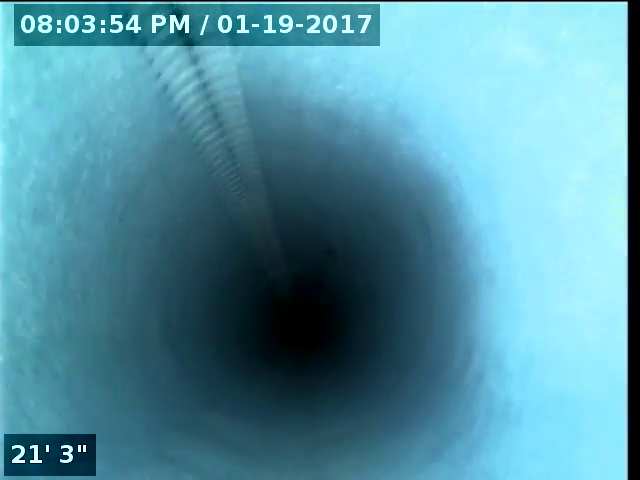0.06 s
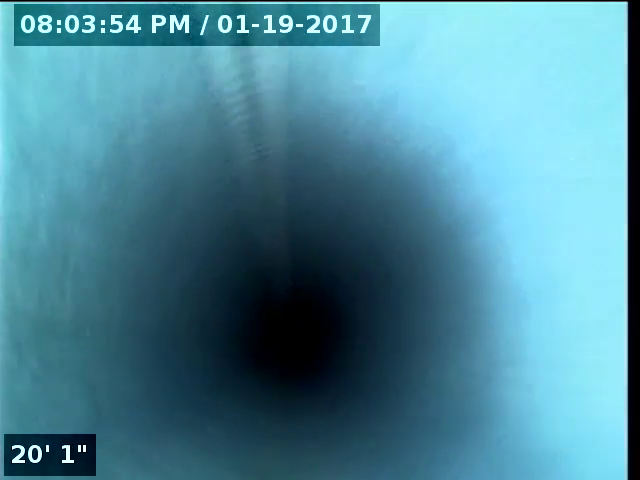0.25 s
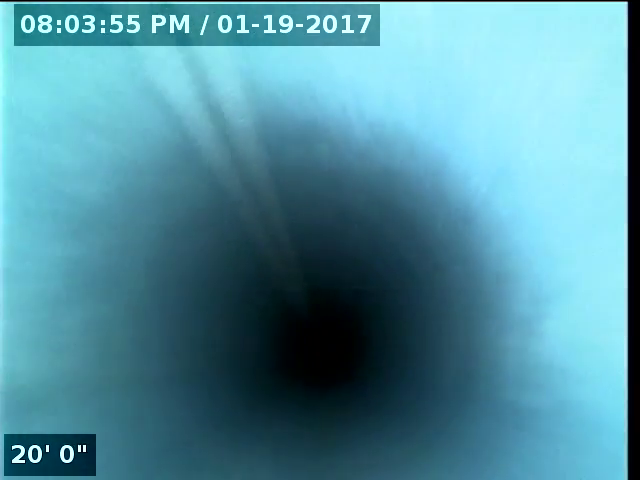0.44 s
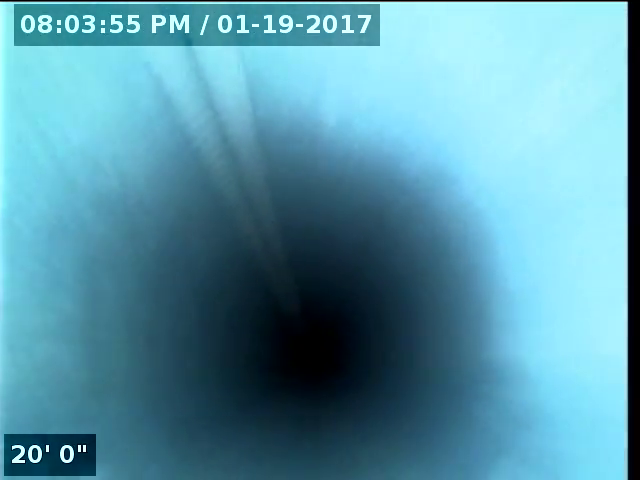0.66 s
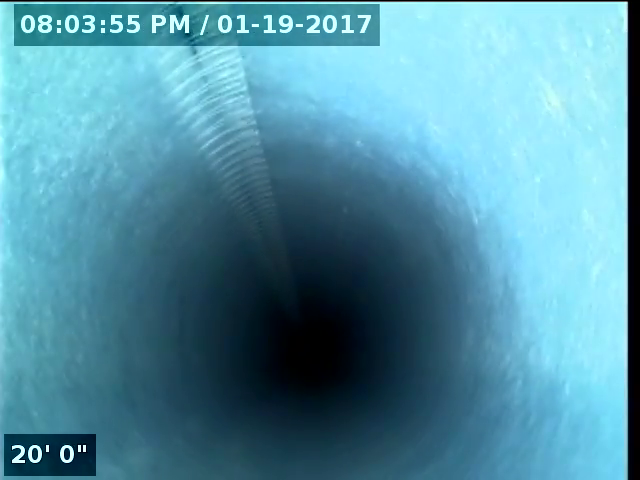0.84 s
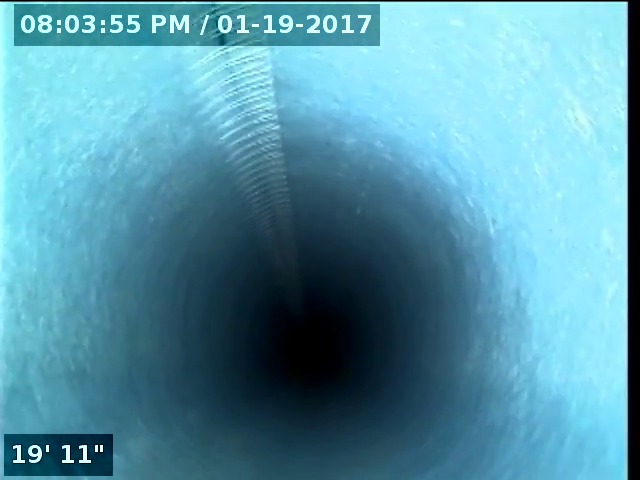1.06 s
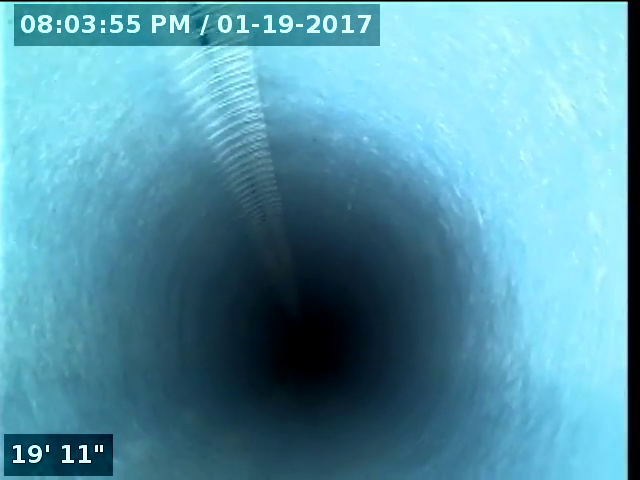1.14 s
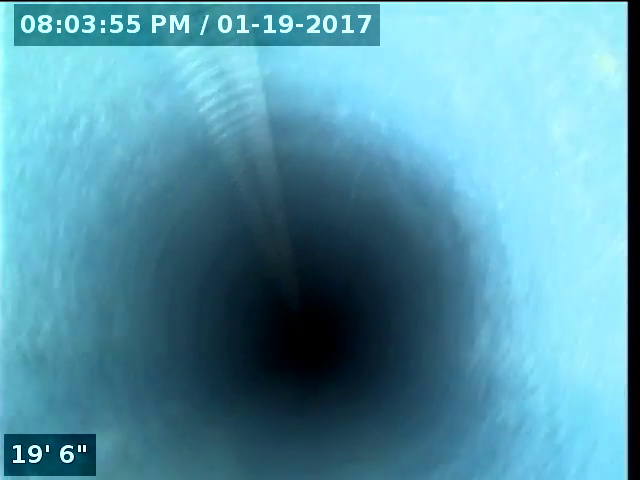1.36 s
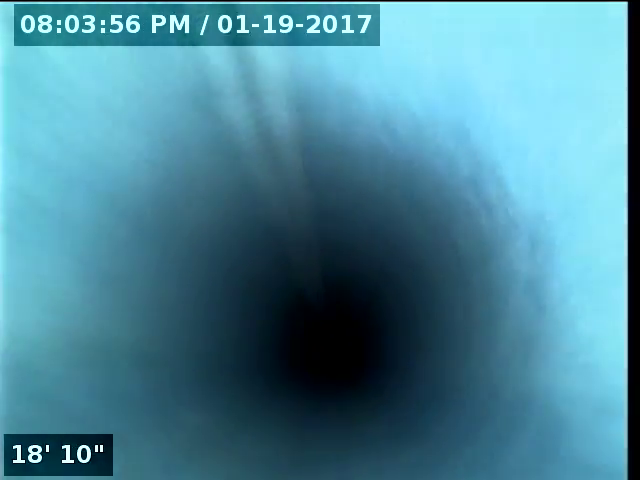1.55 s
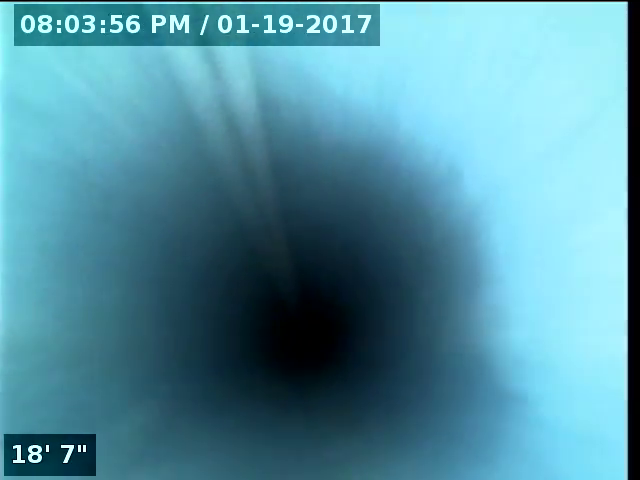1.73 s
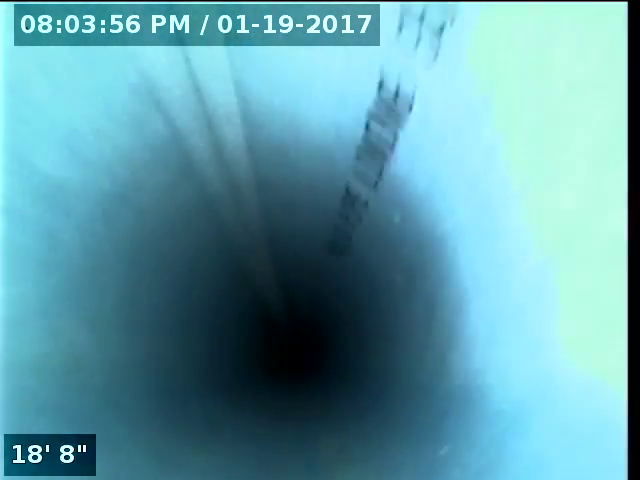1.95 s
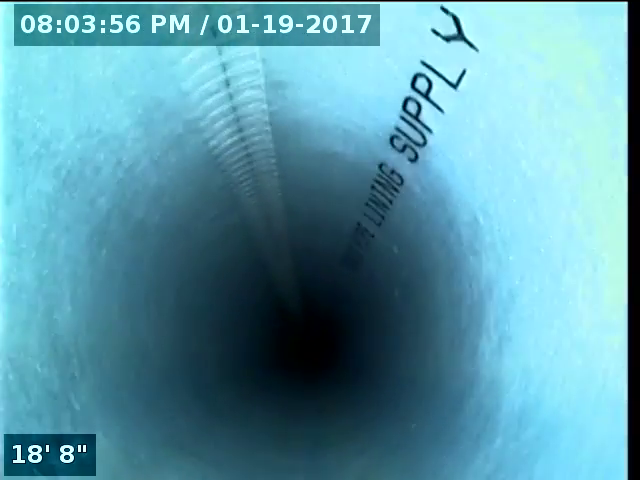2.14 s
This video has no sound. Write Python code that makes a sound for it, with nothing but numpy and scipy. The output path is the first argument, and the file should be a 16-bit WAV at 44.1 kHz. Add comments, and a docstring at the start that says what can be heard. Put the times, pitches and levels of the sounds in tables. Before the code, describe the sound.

A cable rubs through a plastic drain pipe from the start. At about 0.2 seconds one hard, close knock rings the monitor's housing with a hollow boom, overloading the microphone. The rubbing drops low by 0.4 seconds, with scattered light taps, then swells again from 1.1 to 1.6. Soft hollow bumps come around 1 second and 2.1 seconds. A faint steady hiss lies underneath.

```python
"""Camera in a drain pipe

A stiff cable pulls an inspection camera back through a plastic drain pipe, rubbing in uneven pulls.
It taps and bumps along the way, and the bumps set off a low, hollow boom.
One hard knock rings the monitor unit's housing and overloads its small microphone.
The recorder adds a steady hiss and cuts a narrow notch out of the treble."""
import sys
import numpy as np
from scipy import signal
from scipy.fft import rfft, irfft, next_fast_len
from scipy.io import wavfile

SR = 44100
rng = np.random.default_rng(int(sys.argv[2]) if len(sys.argv) > 2 else 0)


def to_wav(s):
    """Save 16-bit WAV."""
    ch = np.atleast_2d(s).T  # columns
    pcm = np.round(np.clip(ch, -1, 1) * 32767)  # PCM
    wavfile.write(sys.argv[1], SR, pcm.astype(np.int16))


N = 97020
TIME = np.arange(N) / SR

# The tone of the recorder's hiss. Each row: frequency in Hz, relative level in dB.
HISS_TONE = [(25, 4), (100, 2.5), (500, -1.5), (2000, 9), (3300, -19.5), (4500, -12), (5500, -5),
             (6200, -1), (7000, -6), (7700, -10), (8200, -31)]
# How strongly the cable rubs as it is pulled. Each row: time in seconds, level in dB.
PULL_LEVELS = [(0, -30), (.12, -28), (.21, -28.5), (.3, -33), (.4, -48), (.52, -51.5), (.62, -50),
               (.68, -47.5), (.83, -49), (.89, -41), (.98, -43), (1.09, -43), (1.16, -33.5), (1.29, -29.5),
               (1.45, -32.5), (1.55, -37.5), (1.64, -48), (1.77, -47), (1.84, -43), (1.98, -48.5),
               (2.06, -42), (2.13, -41), (2.2, -39.5)]
# The tone of the rubbing. Each row: frequency in Hz, relative level in dB.
RUB_TONE = [(30, -55), (120, -8), (190, -8.5), (250, 5), (320, -3), (520, 2.5), (950, -6), (1400, -5.5),
            (2000, -11), (2400, -9), (3100, -17), (3700, -37.5), (6000, -33), (8000, -49)]
# The thin, high swish on top of the rubbing. Each row: time in seconds, level in dB.
SWISH_LEVELS = [(0, -40.5), (.2, -56), (.38, -62), (.49, -53.5), (.6, -64.5), (.72, -54.5), (.9, -65),
                (1.05, -59.5), (1.3, -56), (1.62, -52.5), (1.75, -64), (1.85, -51), (2.05, -60.5),
                (2.2, -52)]
# Light taps of the cable, plus one slow, dull drag of it (the row at 0.875 s). Each row: start in seconds,
# level in dB, centre in Hz, width in Hz, rise time in seconds, fade time in seconds. A fade time (t60) is how
# long a sound takes to drop 60 dB.
CABLE_TAPS = [(0.051, -44, 435, 500, 0.011, 0.061), (0.08, -30, 2140, 2980, 0.0018, 0.06),
              (0.11, -24, 478, 170, 0.0056, 0.13), (.42, -42.5, 584, 587, 0.026, 0.078),
              (.648, -41.5, 435, 550, .012, 0.1), (.67, -48, 2080, 1400, 0.0098, 0.19),
              (0.844, -40, 860, 1220, 0.0066, 0.19), (.875, -40, 740, 1050, 0.065, 0.56),
              (0.976, -33.5, 546, 220, 0.0039, 0.34), (.979, -33.5, 1240, 1240, 0.0044, 0.081),
              (1.13, -42, 1300, 1900, .005, .12), (1.156, -42, 2640, 3200, 0.003, 0.085),
              (1.255, -47.5, 2960, 2200, .006, 0.16), (1.424, -45, 3180, 2200, 0.0062, 0.085),
              (1.463, -28, 1420, 650, 0.0062, 0.054), (1.558, -36.5, 2840, 450, 0.0075, 0.14),
              (1.671, -46.5, 3150, 503, 0.013, 0.083), (1.917, -40, 1610, 810, 0.0066, 0.24),
              (2.0705, -30.5, 680, 590, 0.0017, 0.15), (2.074, -38.5, 1470, 700, 0.0033, 0.14),
              (2.119, -38, 1130, 1100, 0.01, 0.1)]
# Soft bumps that set off the boom. Each row: start in seconds, level in dB.
SOFT_BUMPS = [(0.042, -28), (0.245, -13.5), (.645, -47), (0.757, -49), (0.986, -33.5), (1.04, -44),
              (1.165, -33), (2.072, -35), (2.126, -26)]
# The low notes of the boom. Each row: pitch in Hz, relative level in dB, fade time in seconds.
BOOM_NOTES = [(180.9, 1, 0.28), (208.3, -5, 0.2), (245.4, -9, 0.26)]
# Notes of the monitor unit's housing. Each row: pitch in Hz, relative level in dB, fade time in seconds.
HOUSING_NOTES = [(432, -9, .11), (470, -3, .14), (543, -7, .11), (692, -4, .13), (735, -6, .09),
                 (811, -2, .1), (847, 4, .085), (1098, -6, .1), (1187, -7, .11), (1291, -4, .11),
                 (1326, -3, .11), (1428, -7, .11), (1503, -4, .11), (1779, -7, .1), (2137, -8, .09),
                 (2385, -11, .09)]
# The quick run of hits that makes up the knock. Each row: start in seconds, relative level in dB.
KNOCK_HITS = [(0.2127, -7.5), (0.2158, -13.5), (0.223, -2.5), (0.224, -1.5), (0.2447, -43)]
# The tone of the knock's clatter. Each row: frequency in Hz, relative level in dB.
CLATTER_TONE = [(30, -19.5), (100, -15), (300, -12), (500, 0), (800, 0.5), (1350, 0), (2100, -4),
                (3000, -13.5), (3800, -41), (6000, -22.5), (8000, -36)]

HISS_DB = -55
SLIPS_PER_S, SLIP_SPREAD_DB = 4500, 2.5
RUB_RING_DB, RUB_BOOM_DB = -15.5, -10.5  # ringing, compared with the rubbing itself
RUMBLE_DB, FULL_PULL_DB = -47.5, -29  # the rumble's level at a full pull, and that pull's level
RUMBLE_FOLLOWS = 1.58  # dB of rumble gained for each dB of pull
BUMP_RISE_S, KNOCK_RISE_S = 0.012, 0.0051
KNOCK_RING_DB, CLATTER_DB, THUMP_DB, THUMP_CUTOFF_HZ = -7, -2.5, -24, 51
OVERLOAD = 0.75  # the largest signal the microphone can pass
NOTCH_HZ, NOTCH_WIDTH_HZ, CUTOFF_HZ = 3980, 620, 8250


def from_db(db):
    """Turn decibels into a number to multiply by."""
    return 10 ** (np.asarray(db) / 20)


def rms_one(x):
    """Scale a sound so that its average strength (rms) is 1."""
    return x / np.sqrt(np.mean(x ** 2) + 1e-20)


def noise():
    """White noise: all frequencies equally strong."""
    return rng.standard_normal(N)


def colour(x, tone):
    """Filter a sound to follow a tone table; the result has strength 1."""
    size = 2 * next_fast_len(N)
    hz, db = np.transpose(tone)
    bin_hz = np.maximum(np.arange(size // 2 + 1) * SR / size, 1)
    gains = from_db(np.interp(np.log(bin_hz), np.log(hz), db))
    # Fold the filter in time so that it never sounds before its input (minimum phase).
    cepstrum = irfft(np.log(gains))
    cepstrum[1:size // 2] *= 2
    cepstrum[size // 2 + 1:] = 0
    response = np.exp(rfft(cepstrum))
    return rms_one(irfft(rfft(x, size) * response)[:N])


def noise_band(hz, width_hz):
    """Noise with only the frequencies around hz kept, at strength 1."""
    low = np.sqrt(hz ** 2 + (width_hz / 2) ** 2) - width_hz / 2
    band_pass = signal.butter(3, [low, low + width_hz], "band", fs=SR, output="sos")
    return rms_one(signal.sosfilt(band_pass, noise()))


def ring(x, hz, t60):
    """Each click in x starts one note that rings and fades."""
    decay, angle = from_db(-60 / (t60 * SR)), 2 * np.pi * hz / SR
    return signal.lfilter([0, np.sin(angle)], [1, -2 * decay * np.cos(angle), decay ** 2], x + 1e-18)


def resonate(x, notes):
    """Let x ring a whole table of notes, every other one flipped; the result has strength 1."""
    return rms_one(sum(from_db(db) * (-1) ** k * ring(x, hz, t60)
                       for k, (hz, db, t60) in enumerate(notes)))


def swell(start, rise, t60):
    """A loudness shape that climbs in a straight line, then dies away."""
    age = TIME - start
    return np.clip(age / rise, 0, 1) * np.exp(-np.log(1000) * np.maximum(age - rise, 0) / t60)


def hiss():
    """The recorder's own steady noise."""
    return from_db(HISS_DB) * colour(noise(), HISS_TONE)


def rubbing():
    """Thousands of tiny cable slips blur into a rub, with a swish on top; hard pulls add rumble."""
    pull_db = np.interp(TIME, *np.transpose(PULL_LEVELS))
    size_db = SLIP_SPREAD_DB * np.minimum(rng.exponential(1, N), 4)
    sizes = from_db(size_db) * rng.choice([-1, 1], N)
    slips = sizes * (rng.random(N) < SLIPS_PER_S / SR)
    housing = from_db(RUB_RING_DB) * resonate(slips, HOUSING_NOTES)
    boom = from_db(RUB_BOOM_DB) * resonate(slips, BOOM_NOTES)
    swish_db = np.interp(TIME, *np.transpose(SWISH_LEVELS))
    swish = from_db(swish_db) * noise_band(hz=2660, width_hz=1720)
    rumble_db = RUMBLE_DB + RUMBLE_FOLLOWS * (pull_db - FULL_PULL_DB)
    rumble = from_db(rumble_db) * noise_band(hz=83.3, width_hz=52)
    return from_db(pull_db) * (colour(slips, RUB_TONE) + housing + boom) + swish + rumble


def taps():
    """The cable scuffs in bursts of noise, mostly short taps and one slow drag, each with the tone of the spot
    it touches."""
    return sum(from_db(db) * swell(start, rise, t60) * noise_band(hz, width)
               for start, db, hz, width, rise, t60 in CABLE_TAPS)


def booms():
    """Each soft bump builds up the low, hollow notes, which then ring out."""
    return sum(from_db(bump_db + note_db) * swell(start, BUMP_RISE_S, t60)
               * np.sin(2 * np.pi * hz * (TIME - start))
               for start, bump_db in SOFT_BUMPS for hz, note_db, t60 in BOOM_NOTES)


def knock_shape(t60):
    """The knock's loudness over time: the energy of its hits adds up and dies away."""
    energy = sum((from_db(db) * swell(start, KNOCK_RISE_S, t60)) ** 2 for start, db in KNOCK_HITS)
    return np.sqrt(energy)


def knock():
    """A hard knock sets the housing ringing, with a short clatter and a low thump."""
    ringing = sum(from_db(db) * knock_shape(t60) * np.sin(2 * np.pi * (hz * TIME + rng.random()))
                  for hz, db, t60 in HOUSING_NOTES)
    clatter = knock_shape(t60=0.13) * colour(noise(), CLATTER_TONE)
    low_pass = signal.butter(2, THUMP_CUTOFF_HZ, fs=SR, output="sos")
    thump = knock_shape(t60=0.17) * rms_one(signal.sosfilt(low_pass, noise()))
    return from_db(KNOCK_RING_DB) * ringing + from_db(CLATTER_DB) * clatter + from_db(THUMP_DB) * thump


def scene():
    """The cable's rubbing, taps, booms and the knock, added up at the monitor unit's microphone."""
    return (rubbing() + knock() + taps() + booms())[None]


def record(dry):
    """Overload flattens the loudest peaks; hiss joins in; filters cut a notch and the highest treble."""
    clipped = dry / (1 + (dry / OVERLOAD) ** 8) ** (1 / 8)
    sound = clipped + hiss()
    notch = signal.iirnotch(NOTCH_HZ, NOTCH_HZ / NOTCH_WIDTH_HZ, fs=SR)
    for _ in range(2):  # a second pass makes the notch wider
        sound = signal.lfilter(*notch, sound)
    low_pass = signal.ellip(14, 0.1, 110, CUTOFF_HZ, fs=SR, output="sos")
    return signal.sosfilt(low_pass, sound)


dry = scene()
out = record(dry)
to_wav(out)
```